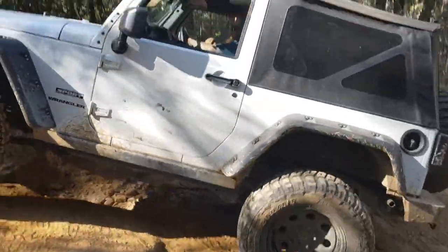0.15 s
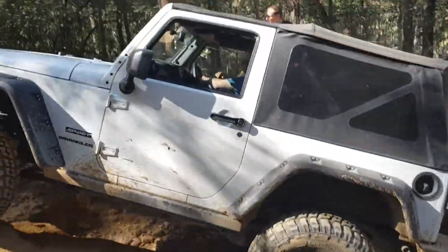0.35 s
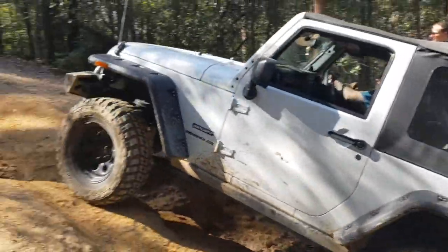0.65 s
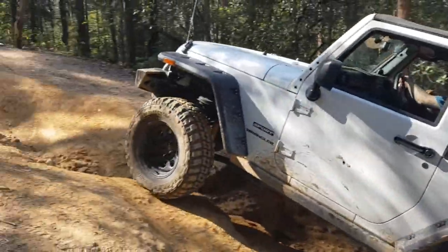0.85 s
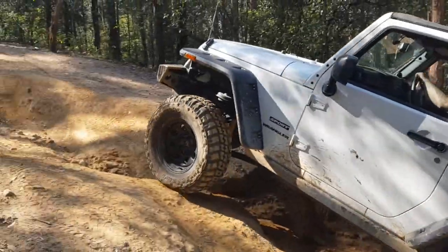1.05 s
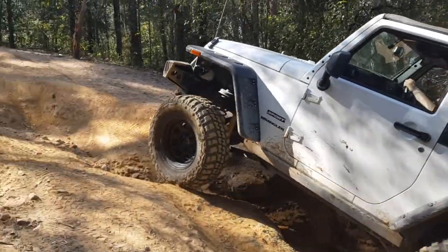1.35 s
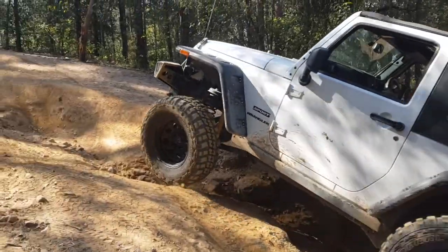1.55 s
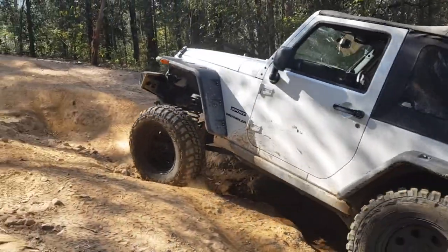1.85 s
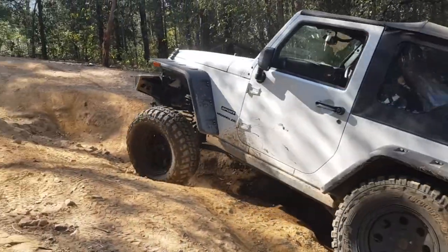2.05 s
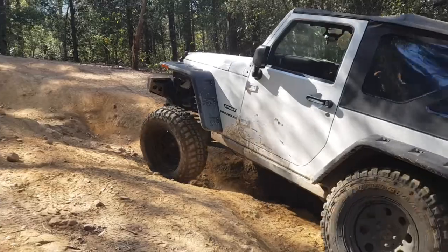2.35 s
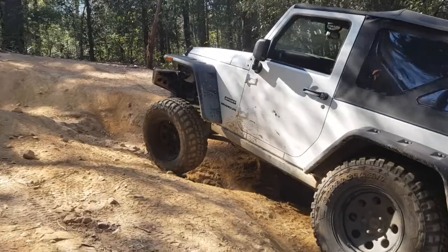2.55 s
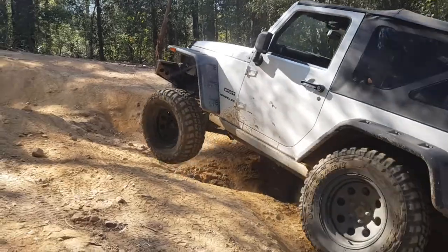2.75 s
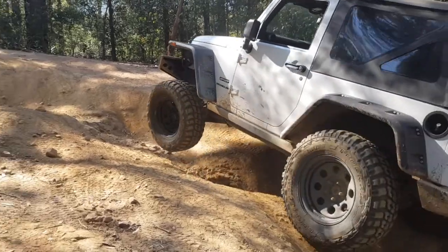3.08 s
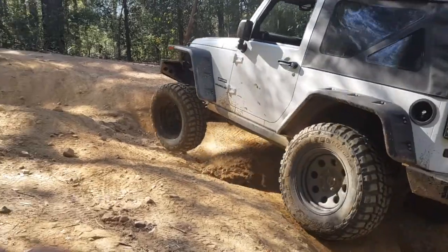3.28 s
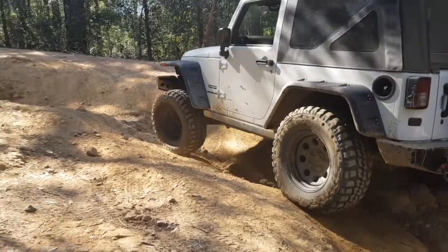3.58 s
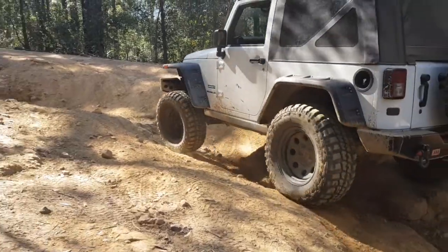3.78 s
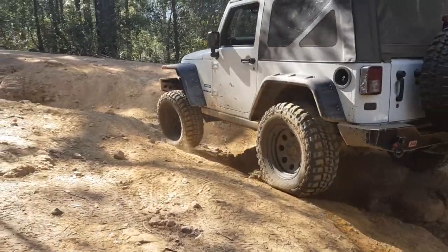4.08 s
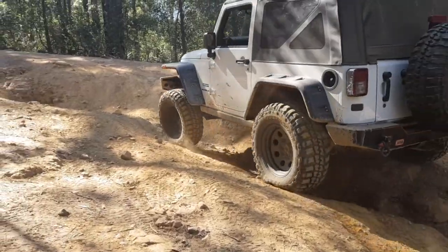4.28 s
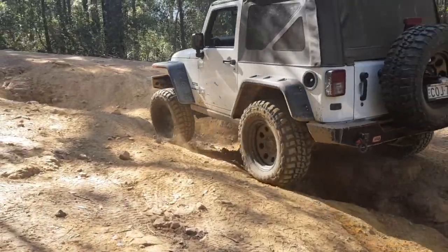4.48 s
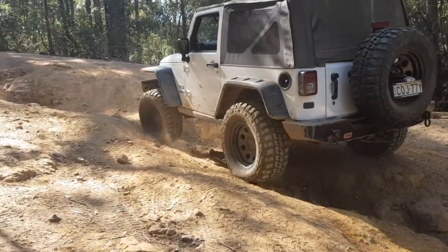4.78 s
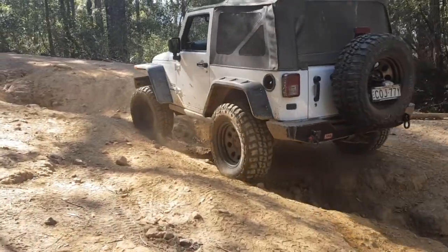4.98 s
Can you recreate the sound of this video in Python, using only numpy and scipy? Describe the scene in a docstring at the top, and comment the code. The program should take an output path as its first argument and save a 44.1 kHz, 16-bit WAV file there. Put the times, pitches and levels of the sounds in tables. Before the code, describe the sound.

Close off-road engine surges and sags under load, with groaning tyre slips, gritty scraping, snapping stones and a few dull knocks.

```python
"""On a rutted dirt bank a six-cylinder four-wheel drive crawls uphill, a few metres away.
The exhaust booms and barks with the throttle: firing orders coloured by pipe and muffler, and puffs of gas.
Fan and valve gear hiss under the bonnet, as noise that throbs with the firings.
The tyres slip and scrub on hard clay, grind grit and spray sand, all built from trains of tiny fractures.
Small stones snap, and clods and suspension knock, as short bursts of coloured noise."""
import sys
import numpy as np
from scipy import signal
from scipy.fft import rfft, irfft
from scipy.io import wavfile

SR = 44100
rng = np.random.default_rng(int(sys.argv[2]) if len(sys.argv) > 2 else 0)


def pcm_store(signal):
    """Save signal as 16-bit PCM."""
    levels = np.round(np.clip(np.atleast_2d(signal), -1, 1) * 32767)
    wavfile.write(sys.argv[1], SR, levels.astype(np.int16).T)


N = 226100
TIME = np.arange(N) / SR
BINS = np.fft.rfftfreq(N, 1 / SR)

# What the muffler lets through. Each row: frequency in Hz, gain in dB.
MUFFLER_PASS = [(50, -4), (90, 2.5), (135, -7), (165, -4), (198, 9.5), (226, -9.5), (257, 3.5), (272, 0),
                (290, -1), (330, -28.5), (385, -21), (436, -31), (520, -59), (620, -34)]


def gain_of(db):
    """A level in decibels is twenty times the logarithm of an amplitude factor."""
    return 10 ** (np.asarray(db) / 20)


def evened(x):
    """Mean power sets the level: scales a signal to an rms of one."""
    return x / np.sqrt(np.mean(x ** 2) + 1e-20)


def read(points, hz):
    """Pitch is logarithmic in frequency, so a spectrum table is joined on a log-frequency axis."""
    f, value = np.transpose(points)
    return np.interp(np.log(hz + 1), np.log(f), value)


def curves(rows):
    """Slow control: joins each column of a time table by straight lines, sample by sample."""
    s, *columns = np.transpose(rows)
    return [np.interp(TIME, s, column) for column in columns]


def wander(rate_hz):
    """Low-passed noise: a random fluctuation of unit rms, mostly slower than the given rate."""
    spectrum = rfft(rng.standard_normal(N))
    return evened(irfft(spectrum / (1 + (BINS / rate_hz) ** 4), N))


def coloured(pair, colour):
    """Partial coherence: filters two signals to a colour, alike in the bass and apart in the treble."""
    # Likeness of the channels. Each row: frequency in Hz, coherence (below zero counts as zero).
    likeness = [(290, 1), (640, 0.62), (1300, 0.63), (3000, 0.13), (15000, -0.4)]
    # Phase by which the left channel lags. Each row: frequency in Hz, phase in radians.
    left_lag = [(100, 1.5), (520, -0.38), (860, 1.76), (1300, -0.5), (1750, 1.93), (4100, 3), (15000, 17)]
    a, b = rfft(pair)
    same = np.clip(read(likeness, BINS), 0, 1)
    left = a * np.exp(-1j * read(left_lag, BINS))
    right = same * a + np.sqrt(1 - same ** 2) * b
    stereo = np.array([left, right])
    return evened(irfft(stereo * gain_of(read(colour, BINS)), N))


def pipe_response(hz, order=6):
    """Standing waves in a pipe: resonances, above a steep low cut, give each frequency its gain and phase."""
    # Pipe modes. Each row: frequency in Hz, width in Hz, level in dB.
    pipe_modes = [(61.9, 15.6, -12.5), (94.6, 8.73, 0), (133, 26, -11), (199.1, 13.9, -12.5),
                  (274, 25.4, -9.5)]
    cut_hz = 55.8  # deeper notes hardly leave the pipe
    waves = sum(gain_of(db) / (1 + 2j * (hz - ring_hz) / width_hz) for ring_hz, width_hz, db in pipe_modes)
    low_cut = signal.butter(order, 1, "high", analog=True)
    return waves * signal.freqs(*low_cut, hz / cut_hz)[1]


def exhaust(firings, firing_hz, throttle_db):
    """Harmonic synthesis: three strong orders of the firing rate swell as they sweep through the pipe modes."""
    # Boom, drone and bark (orders 1, 2, 3): dB gained for each dB of throttle.
    sharpening_by_order = [1.0, 1.69, 2.17]
    # The drone alone as the vehicle passes. Each row: time in seconds, level in dB.
    drone_level = [(0, 2), (1.4, -0.9), (3, -13), (4, -4), (5.13, -5.5)]
    shake, bank = .05, .11  # unevenness by chance, and between the two cylinder banks (shares)
    pipe_lag_s = 0.013  # the standing waves take this long to follow the engine
    alternate = np.cos(np.pi * firings)
    drone_db, = curves(drone_level)
    settled_hz = np.interp(TIME - pipe_lag_s, TIME, firing_hz)
    sound = np.zeros(N)
    for k, sharpening in enumerate(sharpening_by_order, 1):
        strength = 1 + shake * wander(26) + bank * alternate * (k > 1)
        swell = abs(pipe_response(k * settled_hz))
        pipe_turn = np.angle(pipe_response(k * firing_hz))
        wave = swell * np.cos(2 * np.pi * k * firings + pipe_turn)
        level_db = sharpening * throttle_db + drone_db * (k == 2)
        sound -= gain_of(level_db) * np.sqrt(2) * strength * wave
    return sound


def pipe_phase(hz, ring_hz, width_hz):
    """Resonant phase shift: a muffler chamber turns the phase of whatever passes close to its resonance."""
    return np.pi / 2 - np.arctan(2 * (hz - ring_hz) / width_hz)


def burble(firings, firing_hz, level_db):
    """Subharmonics of unevenness: uneven banks add half orders and unequal cylinders sixths, in the muffler."""
    # Muffler chambers: resonances in Hz.
    chambers_hz = [192.4, 250.7, 298.4]
    bank_db, cylinder_db = -7, -25  # half and sixth orders against whole ones
    trim_db, chamber_width_hz, rough_rad = 2.0, 35, .1
    sound, power = np.zeros(N), np.zeros(N)
    for k in range(5, 55):  # in sixths of the firing rate
        strong_order = k in (6, 12, 18)  # these belong to exhaust()
        if strong_order or (k > 30 and k % 3):
            continue
        order = k / 6
        hz = order * firing_hz
        if k % 3:
            uneven_db, start = cylinder_db, rng.random()
        else:
            uneven_db, start = bank_db * (k % 2), (k % 2) / 4
        # the chambers draw each pulse out
        ringing = sum(pipe_phase(hz, chamber, chamber_width_hz) for chamber in chambers_hz)
        gain = gain_of(read(MUFFLER_PASS, hz) + uneven_db)
        phase = 2 * np.pi * (order * firings + start) + ringing + rough_rad * wander(25)
        sound -= gain * np.cos(phase)
        power += gain ** 2 / 2
    return gain_of(level_db + trim_db) * sound / np.sqrt(power)


def puffs(firings, depth):
    """Amplitude modulation: turbulent noise swells with each firing."""
    return rng.standard_normal((2, N)) * np.exp(depth * np.cos(2 * np.pi * firings))


def gas_rush(firings, level_db):
    """Jet noise: gas leaves the tailpipe in turbulent puffs, as a dull rush and a thin rasp."""
    # Rasp, heard as the rear swings round. Each row: time in seconds, level in dB.
    rasp_level = [(0, -82), (3.6, -68), (4.45, -66), (4.62, -47), (4.8, -43.5), (4.95, -44.5),
                  (5.13, -45.5)]
    # Colour of the rasp. Each row: frequency in Hz, spectral density in dB per Hz.
    rasp_colour = [(300, -26), (540, -14), (660, -17), (800, 2), (980, -2), (1220, 6), (1500, -19),
                   (3000, -31), (6000, -55)]
    trim_db, rush_depth, rasp_depth = -15, .8, 0.83
    rush_colour = [(20, -32)] + list(MUFFLER_PASS) + [(1500, -36), (4000, -86)]
    rush = gain_of(level_db + trim_db) * coloured(puffs(firings, rush_depth), rush_colour)
    rasp_db, = curves(rasp_level)
    return rush + gain_of(rasp_db) * coloured(puffs(firings, rasp_depth), rasp_colour)


def engine_bay(firings, throb=0.4):
    """Modulated broadband noise: fan and valve hiss throbs with the firings."""
    # Hiss as the bonnet turns away. Each row: time in seconds, level in dB.
    bay_level = [(0, -34.5), (1.1, -31), (1.9, -33.5), (3.7, -43), (5.13, -40.5)]
    # Colour of the hiss. Each row: frequency in Hz, spectral density in dB per Hz.
    bay_colour = [(100, 24), (330, -5), (450, -11), (850, -2), (1500, 3), (2500, 1.5), (4700, -14.5),
                  (6500, -16.5), (10000, -17), (12000, -12), (15500, -15.5)]
    level_db, = curves(bay_level)
    return gain_of(level_db) * coloured(puffs(firings, throb), bay_colour)


def grains(per_s, spread_db):
    """Shot noise: a random train of tiny fractures, mostly small and a few large."""
    size = gain_of(spread_db * np.minimum(rng.exponential(1, N), 5))
    breaks = rng.random(N) < per_s / SR
    return evened(size * breaks * rng.standard_normal((2, N)))


def crumbs(per_s, spread_db, cycles, count=20):
    """Impulse-driven resonators: crumbs of clay burst, each ringing for a few cycles at one of many pitches."""
    bursts, kind = grains(per_s, spread_db), rng.integers(0, count, (2, N))
    out = np.zeros((2, N))
    for k, hz in enumerate(np.geomspace(600, 6000, count)):
        r = np.exp(-hz / SR / cycles * 2)  # pole radius sets the decay
        turn = 2 * np.pi * hz / SR
        poles = [1, -2 * r * np.cos(turn), r * r]
        ring = signal.lfilter([1, 0, -1], poles, bursts * (kind == k))
        out += evened(ring) * np.sqrt(hz)
    return out


def tyre_levels():
    """Addition of powers: steady rolling, plus slips that build up, hold and die as the tread bites; in dB."""
    # Tyres rolling on clay. Each row: time in seconds, grinding grit in dB, sand spray in dB.
    rolling = [(0, -42.5, -43), (.8, -43, -45), (1.18, -41.5, -40.5), (1.35, -36.5, -34), (1.6, -39, -34),
               (1.74, -38, -37), (1.85, -44.5, -42), (2.15, -42, -43), (2.48, -37, -36.5),
               (2.75, -41, -42.5), (3.05, -36, -39), (3.75, -44.5, -46), (4.3, -46, -49), (4.8, -43, -46),
               (5.13, -45, -45)]
    # Lost grip. Each row: start in seconds, length in seconds, rubber scrub in dB, grinding grit in dB.
    slip_events = [(1.3, 0.082, -29.5, -37), (1.61, 0.035, -41, -32.5), (2.205, 0.051, -37, -31),
                   (2.262, 0.075, -27, -33.5), (2.381, 0.076, -21.5, -33), (2.532, 0.062, -17, -30.5),
                   (2.64, 0.043, -18.5, -29), (2.789, 0.057, -24, -32.5), (2.922, 0.041, -26.5, -33),
                   (2.968, 0.083, -29.5, -32.5), (3.056, 0.03, -24, -27.5), (3.139, 0.061, -29.5, -29.5),
                   (3.296, 0.037, -31, -34), (3.392, 0.064, -28, -33.5), (3.541, 0.032, -31, -33),
                   (3.603, 0.016, -32.5, -34), (3.868, 0.022, -39, -40), (4.03, 0.019, -36, -42),
                   (4.2, .025, -39, -43.5)]
    attack_s, release_s = 0.013, 0.027
    roll_scrub_db = 5  # rubber scrub of a rolling tyre, above its grit
    slip_sand_db = -12.5  # sand thrown by a slip, against the mean of its scrub and grit
    grit_db, sand_db = curves(rolling)
    power = gain_of([grit_db + roll_scrub_db, grit_db, sand_db]) ** 2
    for start, length, scrub, grit in slip_events:
        age = TIME - start
        rise = np.clip(age / attack_s, 0, 1)
        shape = rise * np.exp(-np.maximum(age - length, 0) / release_s)
        sand = (scrub + grit) / 2 + slip_sand_db
        power += np.outer(gain_of([scrub, grit, sand]), shape) ** 2
    return 10 * np.log10(power)


def tyres():
    """Stick-slip friction: tread blocks catch and let go, driving scrub, crushed grit and flying sand together."""
    # Colours of rolling scrub, groaning carcass, grit and sand.
    # Each row: frequency in Hz, spectral density in dB per Hz.
    scrub_colour = [(120, -1), (250, 2), (370, 0), (500, 4), (620, -4.5), (900, -17.5), (1500, -72),
                    (3000, -47)]
    groan_colour = [(110, -18), (190, 5), (340, 2), (450, 5.5), (570, -3.5), (660, -1), (820, -12),
                    (1500, -28), (3000, -41)]
    grit_colour = [(400, -11), (750, 2), (1200, 5.5), (1650, 3.5), (2300, -0.5), (3200, -9.5),
                   (4500, -33.5), (8000, -9)]
    sand_colour = [(1500, -2.5), (3000, -2.5), (4200, -2), (5000, -4), (5800, -13), (7200, -18),
                   (9000, -16.5), (13000, -16.5), (15500, -24)]
    judder_db, sand_judder_db = -0.7, 1.44  # opposite signs: sand swells as scrub and grit dip
    scrub_trim_db, sand_trim_db = 0.32, 0.8
    spin_db, pebble_db = -28, -11
    scrub_db, grit_db, sand_db = tyre_levels()
    slipping = np.clip((grit_db + 51) / 12, 0, 1.2)  # the louder the grit, the deeper the judder
    judder = slipping * wander(49)
    spin = np.clip((scrub_db - spin_db) / 6, 0, 1)  # a hard spin sets the whole carcass groaning
    rubber = np.sqrt(1 - spin) * coloured(grains(1500, 1.9), scrub_colour)
    rubber = rubber + np.sqrt(spin) * coloured(grains(1800, 2.6), groan_colour)
    scrub = gain_of(scrub_db + scrub_trim_db + judder_db * judder) * rubber
    clay = crumbs(per_s=4000, spread_db=1.5, cycles=9.0)
    grit = gain_of(grit_db + judder_db * judder) * coloured(clay, grit_colour)
    spray = grains(14000, 0.68) + gain_of(pebble_db) * grains(300, 0.99)  # fine sand and sparser pebbles
    sand = gain_of(sand_db + sand_trim_db + sand_judder_db * judder) * coloured(spray, sand_colour)
    return scrub + grit + sand


def add(mix, s, sound):
    """Superposition: lays a stereo sound into the mix at time s."""
    part = mix[:, max(round(s * SR), 0):][:, :sound.shape[1]]
    part += sound[:, :part.shape[1]]


def hit(level_db, ring_hz, octaves, decay_s, likeness):
    """Damped impact: a crack and a burst of noise about one pitch; the narrower its band, the longer it rings."""
    crack, crack_s = 1.6, .0008  # height against the burst, decay in seconds
    t = np.arange(SR // 8) / SR
    hz = np.fft.rfftfreq(len(t), 1 / SR) + 1
    a, b = rng.standard_normal((2, len(t)))
    pair = np.array([a, likeness * a + np.sqrt(max(1 - likeness ** 2, 0)) * b])
    band = (1 + (np.log2(hz / ring_hz) / octaves) ** 2) ** 2
    body = irfft(rfft(pair) / band, len(t))
    fade = np.exp(-t * np.sqrt(octaves) / decay_s) + crack * np.exp(-t / crack_s)
    return gain_of(level_db) / 2 * evened(body * fade) * np.sqrt(np.mean(fade ** 2))


def stones_and_knocks():
    """Impact excitation: brittle stones snap and scatter; clods and suspension mostly knock lower."""
    # Stones snapping under the tread. Each row: start in seconds, level in dB, ring in Hz.
    stone_snaps = [(0.445, -38, 11700), (1.062, -41, 3998), (1.639, -29.5, 5300), (1.975, -37, 4992),
                   (2.229, -32, 7540), (3.742, -44.5, 9100), (3.849, -33, 4240), (4.044, -37, 3800),
                   (4.172, -36.5, 3750), (4.461, -36, 4020), (4.909, -52, 12460)]
    # Clods and suspension. Each row: start in seconds, level in dB, ring in Hz, spread in octaves.
    low_knocks = [(.126, -19.5, 520, 0.77), (1.754, -16.5, 520, 0.28), (2.526, -17.5, 480, 0.22),
                  (2.983, -35, 1650, 0.73), (3.286, -24.5, 1330, 0.75), (3.617, -25, 1650, 0.59),
                  (3.849, -25, 504, 0.47), (3.918, -33, 1300, 0.83), (4.141, -31, 1100, 1.5)]
    out = np.zeros((2, N))
    for s, level_db, ring_hz in stone_snaps:
        add(out, s, hit(level_db, ring_hz, octaves=0.68, decay_s=.010, likeness=0.12))
    for s, level_db, ring_hz, octaves in low_knocks:
        add(out, s, hit(level_db, ring_hz, octaves, decay_s=.009, likeness=0.82))
    return out


def scene():
    """Common excitation: speed and throttle drive exhaust and engine bay; the tyres work the ground beneath."""
    # Engine speed. Each row: time in seconds, firings per second.
    engine_speed = [(0, 43.8), (0.3, 41.3), (0.6, 36.8), (0.82, 36.1), (0.96, 39.3), (1.09, 47.7),
                    (1.26, 59.5), (1.38, 61.6), (1.6, 57.3), (1.92, 50.6), (2.06, 52.8), (2.24, 60.7),
                    (2.46, 74.1), (2.56, 78.2), (2.77, 73.4), (2.91, 61.9), (3, 58.0), (3.12, 61.7),
                    (3.31, 71.4), (3.5, 64.0), (3.73, 53.2), (3.96, 62.4), (4.13, 62.4), (4.48, 55.7),
                    (4.63, 59.1), (4.84, 68.0), (5.13, 73.8)]
    # Strength of the exhaust pulses. Each row: time in seconds, level in dB.
    throttle_level = [(0, -4), (.5, -5), (.9, -4.5), (1.12, -5), (1.32, .5), (1.7, -4.5), (2, -8.5),
                      (2.2, -1), (2.38, 0), (2.75, -3.8), (2.92, -1.5), (3.22, -0.04), (3.46, -2.5),
                      (3.62, -12), (3.95, -8), (4.25, -9.5), (4.55, -5.5), (4.82, -2.5), (5.13, -1.5)]
    # Burble at full throttle, before its trim. Each row: time in seconds, level in dB.
    open_burble = [(0, -32.5), (.7, -28.5), (1.12, -24), (1.5, -29.5), (2, -23.5), (2.32, -36),
                   (2.56, -21.5), (2.8, -32.5), (3.45, -27.5), (4.55, -28), (4.92, -21.5), (5.13, -23.5)]
    burble_share = 0.24  # dB of burble for each dB of throttle
    firing_hz, = curves(engine_speed)
    throttle_db, = curves(throttle_level)
    open_burble_db, = curves(open_burble)
    burble_db = open_burble_db + burble_share * throttle_db
    firings = np.cumsum(firing_hz) / SR  # running count
    pipe = exhaust(firings, firing_hz, throttle_db) + burble(firings, firing_hz, burble_db)
    pipe = pipe + gas_rush(firings, burble_db)
    return pipe + engine_bay(firings) + tyres() + stones_and_knocks()


def record(dry):
    """Linear filtering: each channel takes its own colour, then soft ends and a band limit."""
    # Channel balance. Each row: frequency in Hz, left minus right in dB.
    balance = [(150, .5), (380, 2), (700, 3), (1290, 1.5), (2380, 3), (4400, -6), (8100, -3), (13000, .5)]
    edge_hz = 15750
    tilt_db = read(balance, np.fft.rfftfreq(2 * N, 1 / SR)) / 2
    channels = irfft(rfft(dry, 2 * N) * gain_of([tilt_db, -tilt_db]))[:, :N]
    channels = channels * signal.windows.tukey(N, .001)
    low_pass = signal.firwin(511, edge_hz, window=("kaiser", 9), fs=SR)
    return signal.oaconvolve(channels, low_pass[None], "same")


dry = scene()
out = record(dry)
pcm_store(out)
```